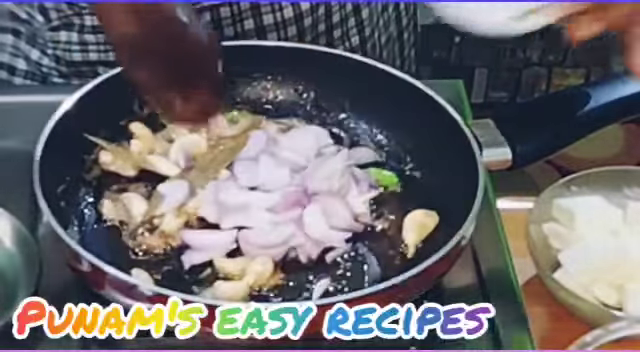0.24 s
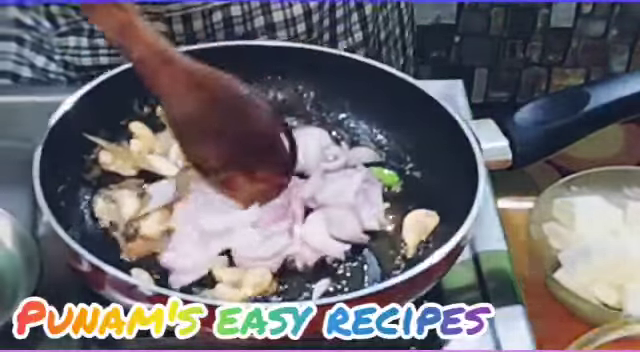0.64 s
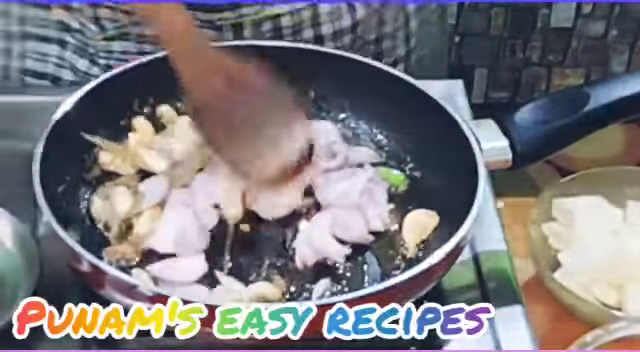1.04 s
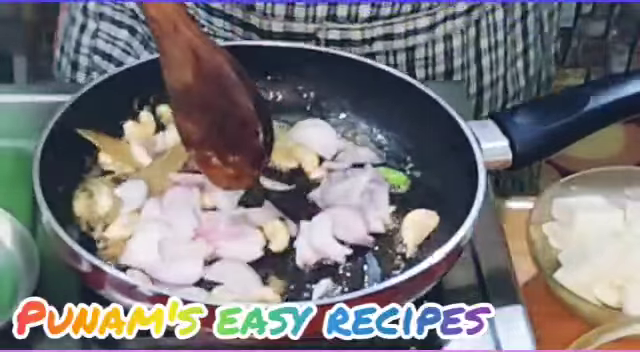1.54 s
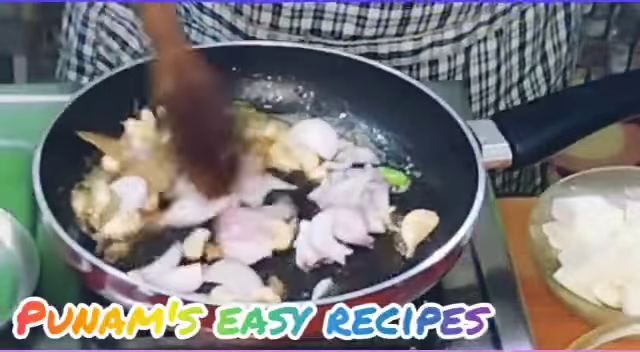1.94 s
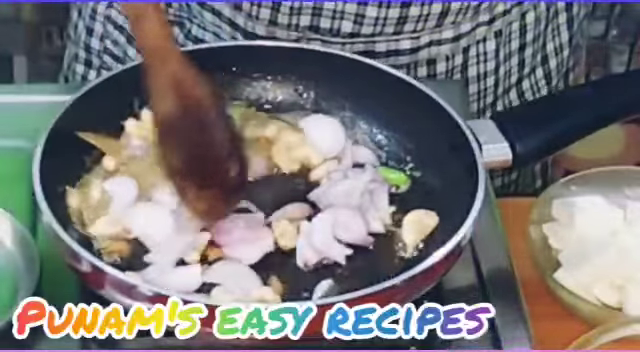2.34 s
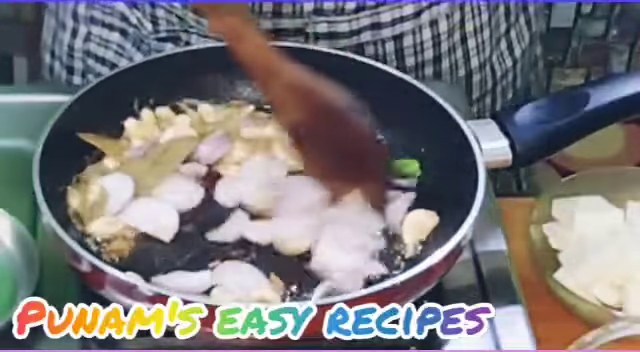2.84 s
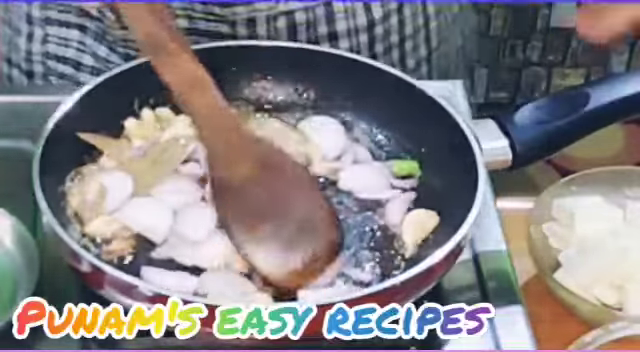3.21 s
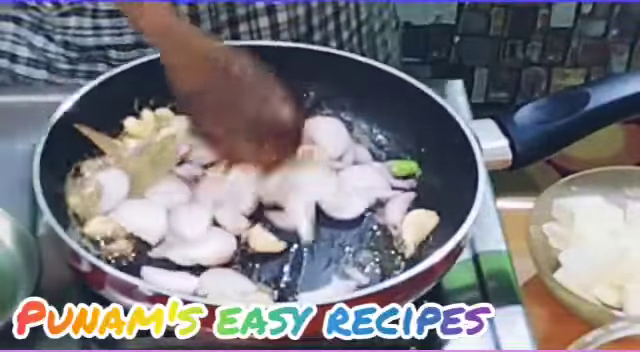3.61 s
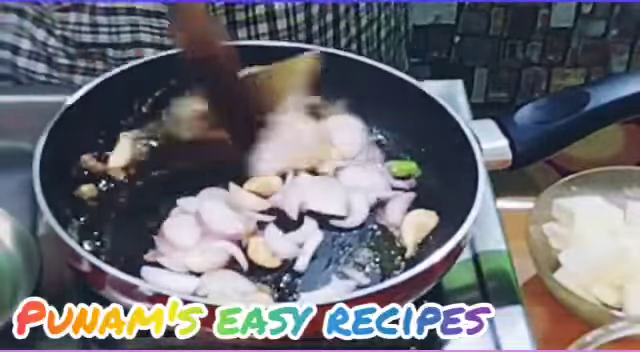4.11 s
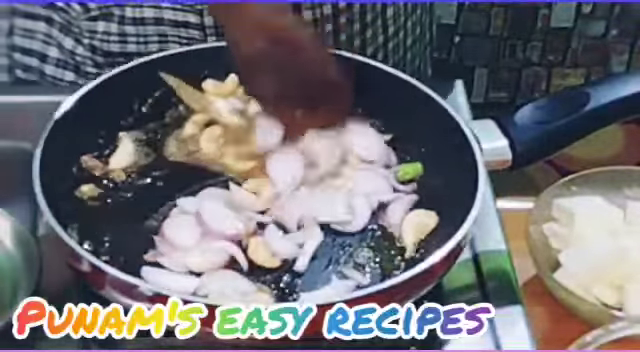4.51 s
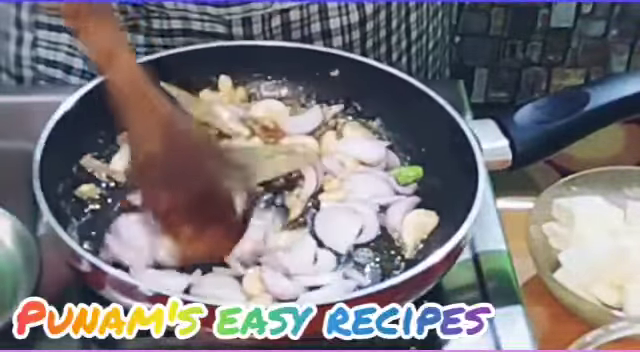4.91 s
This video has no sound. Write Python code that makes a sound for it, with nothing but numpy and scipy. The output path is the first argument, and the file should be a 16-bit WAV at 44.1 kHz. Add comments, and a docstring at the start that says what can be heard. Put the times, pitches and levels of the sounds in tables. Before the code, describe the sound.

Onions fry in butter with a crisp, airy hiss, stronger in the right channel than the shaded left. Each spatula turn makes it flare and spit snappy droplets. Soft scraping, slippery rustles and low pan bumps accompany the stirring, with muffled knocks before two seconds, then a dry clack and brighter knock past three and a half. Short tiled-room reflections and a faint motor draught surround it.

```python
"""Sliced onions sizzle in hot butter: thousands of tiny pings a second, over hiss, are bursting steam bubbles.
Drops spit as snaps of noise and in flurries of short pings; stirred slices rustle in filtered ticks.
A wooden spatula scrapes and knocks the pan, a bank of ringing modes that bumps on the stove; one hard clack.
A motor hums in steady lines over a noise draught in the small tiled kitchen.
The right microphone port faces the pan, the left one is shaded."""
import sys
import numpy as np
from scipy import signal
from scipy.fft import rfft, irfft, next_fast_len
from scipy.io import wavfile
from scipy.ndimage import uniform_filter1d, map_coordinates

SR = 44100
rng = np.random.default_rng(int(sys.argv[2]) if len(sys.argv) > 2 else 0)


def unload_audio(sound):
    """Save the sound as a 16-bit wav file, at the path given as the first command line argument."""
    columns = np.transpose(np.atleast_2d(sound))
    # keep every value between -1 and 1, then stretch to whole-number steps
    steps = np.round(np.clip(columns, -1, 1) * 32767)
    wavfile.write(sys.argv[1], SR, steps.astype(np.int16))


N = 227192
TOP_HZ = 15800  # band limit of the recorder, and the highest bubble pitch

# colour of frying sound at the microphone port that faces the pan: pitch_hz, relative_db
FACING_PORT = [(300, -39), (1100, -32.5), (2500, -27), (3700, -21), (5000, -21.5), (6300, -19.5),
               (7300, -17.5), (8200, -9.5), (9100, -3.5), (10300, -10), (12300, -10), (14200, -9),
               (15600, -5)]


def sizzle():
    """Bubble pings and the hiss of countless finer bubbles, in three bands that rise and fall separately."""
    simmer_db = simmer(np.arange(N) / SR)
    flare_db, fizz_flare_db = flares()
    mean_db = simmer_db.mean()
    level_db = simmer_db + flare_db
    fizz_db = simmer_db + 1 + fizz_flare_db + 0.22 * wobble(21.5)
    # big wet bubbles follow the simmer and its flares only in part
    sputter_db = mean_db - 17.5 + 0.76 * (simmer_db - mean_db) + 0.43 * flare_db + 0.5 * wobble(14)

    pings = np.array([in_kitchen(port, wet_db=-11)[0, :N] for port in bubbles()])
    hiss = amp(1) * rng.standard_normal((2, N))
    pair = uneven(pings + hiss, depth_db=1.4)
    pair = at_ports(pair / pair.std(axis=1, keepdims=True))

    # big wet bubbles sound low, the finest ones sound highest
    low = filtered(pair, lambda hz: 1 / (1 + (hz / 6400) ** 10))
    high = filtered(pair, lambda hz: 1 - 1 / (1 + (hz / 11500) ** 20))
    middle = pair - low - high
    sputter = uneven(low, depth_db=1.5, size=(4, 3))
    layers = [(middle, level_db), (high, fizz_db), (sputter, sputter_db)]
    return sum(band / np.std(band.mean(0)) * amp(db) for band, db in layers)


def bubbles(count=32000, life_s=0.000084):
    """Each bursting bubble is a tiny ping of its own pitch and size, in another phase at each port."""
    when, pitch, *phases = rng.random((4, count, 1))
    size_db = 3.9 * np.clip(rng.standard_normal((count, 1)), -2.5, 2.1)
    k = np.arange(SR // 1000)
    fade = amp(size_db) * np.exp(-k / SR / life_s)
    pings = [fade * np.sin(2 * np.pi * (pitch * TOP_HZ * k / SR + phase)) for phase in phases]
    places = ((when * N).astype(int) + k).ravel()
    return np.array([unit(np.bincount(places, port.ravel(), N)[:N]) for port in pings])


def simmer(s):
    """Level in dB of the steady frying at times s, which builds as the onions warm and spread."""
    # the steady frying: time_s, level_db
    frying_levels = [(0, -42), (.4, -39), (1.1, -35), (1.75, -35), (2.4, -31.5), (2.95, -31.5),
                     (3.9, -33.5), (4.4, -34.5), (4.7, -32), (5.15, -33)]
    return np.interp(s, *np.transpose(frying_levels))


def flares():
    """Stirring turns wet onion onto hot metal: rises in dB of sizzle and fizz that swell and dry off."""
    # turns of wet onion: start_s, time_to_peak_s, sizzle_rise_db, finest_fizz_rise_db
    turns = [(.063, 0.035, 1.5, -2), (.461, 0.055, 2.5, 1.5), (.633, 0.019, 3, 3), (.815, 0.06, 3.5, 4.5),
             (.925, 0.073, 2, 3.5), (1.215, 0.12, 3.5, 5), (1.82, 0.13, 1.5, 3), (2.045, 0.045, 4, -1),
             (2.2, 0.027, 2.2, 2), (2.594, 0.025, 5.5, 3), (2.627, 0.069, 2, -0.5),
             (2.827, 0.091, 1.7, 3.5), (3.123, .071, 1.5, 1.5), (4.02, 0.092, 3.5, 3), (4.259, 0.016, 3, 3),
             (4.538, 0.042, 2, 2.5), (4.722, 0.083, 1, 0.5), (4.831, 0.09, -0.5, 2.5)]
    track = np.zeros((2, N))
    for s, swell_s, *rises_db in turns:
        u = np.arange(SR) / SR / swell_s
        add(track, s, np.outer(rises_db, u ** 2 * np.exp(2 - 2 * u)))
    return track


def uneven(x, depth_db, size=(3, 7)):
    """Random smooth gain over frequency and time makes the noise uneven; size is in bins and frames."""
    z = signal.stft(x, nperseg=256)[2]
    field = uniform_filter1d(rng.standard_normal(z.shape[1:]), size[0], 0)
    field = uniform_filter1d(field, size[1], 1)
    return signal.istft(z * amp(depth_db * unit(field)), nperseg=256)[1][:, :N]


def spits(lowest_hz=5000, small_count=12, life_s=0.00035):
    """A drop of water flashes to steam with one very short, high snap."""
    # the loudest drops, as heard at the facing port: time_s, peak_db
    loud_drops = [(.144, -15), (.511, -17), (.646, -12), (1.305, -11), (1.421, -11), (1.851, -14),
                  (2.045, -10), (2.101, -9), (2.243, -7), (2.426, -11), (2.614, -5.5), (2.677, -9),
                  (2.703, -8), (2.754, -9), (3.103, -10), (3.165, -12), (3.559, -10), (3.620, -9),
                  (3.806, -11), (4.047, -12), (4.413, -12), (4.580, -8.5), (4.759, -8), (5.039, -11)]
    small_drops = []
    for s in rng.random(small_count) * N / SR:
        # peak 8 dB over the simmer, with a scatter of 1 dB
        small_drops.append((s, simmer(s) + 8 + rng.standard_normal()))

    track, t = np.zeros(N), np.arange(SR // 200) / SR
    fade = np.exp(-t / life_s)
    for s, db in list(loud_drops) + small_drops:
        noise = rng.standard_normal(len(t)) * fade
        snap = filtered(noise, lambda hz: 1 - 1 / (1 + (hz / lowest_hz) ** 4))
        heard = np.convolve(snap, impulse(FACING_PORT))
        add(track, s, amp(db) * snap / np.abs(heard).max())
    return at_ports([track, track], shade_db=-13)


def spatters(rate=420, spread_db=4, pitch_scatter=0.19, life_s=0.00085):
    """A wet face of onion slaps onto the metal and throws a quick flurry of droplets, each a short ping."""
    # flurries of droplets, as heard at the facing port: start_s, length_s, level_db, centre_hz
    flurries = [(.482, 0.018, -41, 8000), (1.614, 0.027, -35, 7300), (1.672, 0.024, -29, 12500),
                (2.076, .04, -33, 8100), (2.24, .025, -28, 8330), (2.659, 0.054, -27, 7700),
                (2.955, 0.025, -29, 9300), (3.16, 0.047, -37, 8800), (4.035, .015, -27, 8900),
                (4.102, 0.024, -27, 7310), (4.63, .05, -32.5, 8150)]
    track, t = np.zeros(N), np.arange(SR // 400) / SR
    for s, length, db, centre_hz in flurries:
        flurry = np.zeros(SR // 2)
        # the droplets are densest at 0.3 of the length
        for when in rng.triangular(0, .3, 1, int(rate * length) + 1) * length:
            size, pitch = rng.standard_normal(2)
            hz = centre_hz * np.exp(pitch_scatter * pitch)
            ping = np.exp(-t / life_s) * np.sin(2 * np.pi * hz * t)
            add(flurry, when, amp(spread_db * size) * ping)
        heard = np.convolve(flurry[:int(length * SR) + len(t)], impulse(FACING_PORT))
        add(track, s, amp(db) * flurry / np.sqrt(np.sum(heard ** 2) / (length * SR)))
    return at_ports([track, track], shade_db=-19)


def rustles(rate=900, spread_db=4, sharpness=0.86):
    """Crisp slices, pushed over each other, slip in many small ticks; sharpness is centre over width."""
    # rubs, with levels ahead of the port gains and the walls: start_s, length_s, relative_db, centre_hz
    rubs = [(.98, 0.12, -57, 4500), (1.235, 0.075, -53, 3750), (2.062, 0.054, -49.5, 4380),
            (2.30, 0.11, -55.5, 2570), (2.50, 0.13, -53.5, 2270), (2.86, 0.066, -56, 3800),
            (3.399, 0.11, -60.5, 1940), (3.93, 0.23, -61.5, 2000), (4.25, 0.28, -62.5, 1770),
            (4.50, 0.29, -74, 3800)]
    track = np.zeros((2, N))
    for s, length, db, centre_hz in rubs:
        n = int(max(length, .02) * SR)
        ticks = bursts(n, rate, spread_db) * signal.windows.tukey(n, .5)
        detune = lambda hz: hz / centre_hz - centre_hz / (hz + 1)
        rub = filtered(ticks, lambda hz: 1 / (1 + (sharpness * detune(hz)) ** 2))
        add(track, s, in_kitchen(amp(db) * unit(rub), wet_db=-3.5))
    return track * amp([[-2.5], [1.5]])  # left and right, in dB


def knocks(thud=7, thud_hz=620, thud_life_s=0.00086, held_cycles=15):
    """Wood strikes the pan and stays on it, stilling the high modes first; onions in between soften it."""
    # strikes, rebounds and the tipped pan dropping back, ahead of the port gains and the walls:
    # time_s, relative_db, contact_cutoff_hz
    blows = [(1.846, -39, 650), (1.853, -45, 780), (1.861, -38, 657), (1.892, -43.5, 210),
             (1.908, -50, 318), (2.071, -50.5, 520), (2.084, -49, 422), (2.124, -52, 260),
             (2.613, -57, 710), (3.790, -35.5, 1350), (3.803, -44.5, 259), (3.822, -50, 800),
             (3.860, -51, 500)]
    track, onset = np.zeros((2, N)), SR // 50
    for s, db, cutoff_hz in blows:
        ring = pan_ring(held_cycles)
        t = np.arange(len(ring)) / SR
        wood_hz = np.sqrt(thud_hz * cutoff_hz)  # a harder contact thuds higher
        wood = thud * np.exp(-t / thud_life_s) * np.sin(2 * np.pi * wood_hz * t)
        blow = cushioned(ring / np.std(ring[:onset]) + wood, cutoff_hz)
        add(track, s, in_kitchen(amp(db) * blow / np.std(blow[:onset]), wet_db=-3))
    return track * amp([[-.7], [.7]])  # left and right, in dB


def scrapes(dead_life_s=0.005):
    """The spatula's edge catches and slips; resting on the pan, it damps the modes it shakes."""
    # strokes across the pan, with levels ahead of a common cut:
    # start_s, length_s, relative_db, contact_cutoff_hz
    strokes = [(0.39, 0.052, -65.5, 300), (.71, 0.053, -53.5, 445), (.755, 0.13, -57, 378),
               (1.10, 0.17, -58, 440), (2.055, 0.03, -40.5, 480), (2.42, 0.26, -58, 380),
               (2.724, 0.16, -62, 260), (3.055, 0.085, -55, 407), (3.409, 0.17, -60, 330),
               (3.768, 0.025, -42, 1160), (3.88, 0.12, -55, 375), (4.379, 0.079, -60.5, 520),
               (4.801, 0.064, -59.5, 396), (5.07, 0.086, -57, 400)]
    track = np.zeros((2, N))
    for s, length, db, cutoff_hz in strokes:
        n = int(max(length, .02) * SR)
        slips = bursts(n, rate=700, spread_db=0.5) * signal.windows.tukey(n, .55)
        ring = pan_ring()
        ring *= np.exp(-np.arange(len(ring)) / SR / dead_life_s)
        rub = cushioned(signal.fftconvolve(slips, ring), cutoff_hz)
        add(track, s, in_kitchen(amp(db - 5.5) * rub / (np.std(rub[:n]) + 1e-9), wet_db=-2.5))
    return track


def pan_ring(held_cycles=np.inf, scatter_db=1.5):
    """The pan's modes, at new strengths for every contact; when held, they die within some cycles."""
    # modes of the pan with its load: pitch_hz, relative_db, t60_s
    modes = [(158.4, -7.5, 0.21), (237.6, -1.5, 0.21), (297, 0.5, 0.1), (386, -4.5, 0.072),
             (447.5, -2.5, 0.08), (523, -5, 0.071), (614, 1.5, 0.17), (726, 0.5, 0.25), (762, -6.5, 0.13),
             (890, 0, 0.069), (1031, -1, 0.08), (1070, 3.5, 0.074), (1260, 6.5, 0.18), (1390, 3, 0.1),
             (1600, 4, .06), (1750, -5, 0.05), (2130, 3, 0.039)]
    t = np.arange(SR // 4) / SR
    hz, db, t60 = np.transpose(modes)[:, :, None]
    sizes = amp(db + scatter_db * rng.standard_normal(hz.shape)) * rng.choice([-1, 1], hz.shape)
    fade = amp(-60 * t / t60) * np.exp(-t * hz / held_cycles)
    return np.sum(sizes * fade * np.sin(2 * np.pi * hz * t), axis=0)


def cushioned(x, cutoff_hz, bass_share=0.34):
    """A soft contact gives a dull, low sound; a hard one is brighter and thinner."""
    soft = signal.butter(3, min(cutoff_hz, SR / 4), fs=SR, output="sos")
    thin_hz = np.clip(bass_share * cutoff_hz, 130, 600)
    thin = signal.butter(3, thin_hz, "high", fs=SR, output="sos")
    return signal.sosfilt(np.vstack([soft, thin]), x)


def bumps(swell_s=0.0072):
    """Pushed sideways by the spatula, the pan rocks on the stove with dull low thuds."""
    # rocking thuds: start_s, peak_db, pitch_hz
    rocks = [(.414, -59, 101), (.464, -59, 85), (.728, -61, 115), (1.132, -56, 104), (1.164, -56, 115),
             (1.19, -55, 85), (1.491, -63, 100), (1.877, -50, 115), (2.065, -59, 105), (2.14, -54, 100),
             (2.484, -58, 100), (2.748, -54, 100), (3.132, -60, 101), (3.422, -60, 104), (3.487, -63, 105),
             (3.791, -51, 109), (4.554, -61, 100), (5.099, -46, 102)]
    track, t = np.zeros(N), np.arange(SR // 5) / SR
    shape = (t / swell_s / 2) ** 2 * np.exp(2 - t / swell_s)  # peaks after two swell times
    for s, db, hz in rocks:
        add(track, s, amp(db) * shape * np.sin(2 * np.pi * hz * t))
    return track


def clacks(rattle_db=-25, rattle_life_s=0.015, graze_db=-37, graze_s=.008):
    """A hard, dry contact a little way off grazes, hits, chatters briefly and wakes the room."""
    # hits, with the peak ahead of the chatter and the walls: time_s, peak_db
    hits = [(3.6335, -21)]
    # colour of the hard contact: pitch_hz, relative_db
    contact_colour = [(300, -34), (800, -9.5), (1500, -2), (2200, -3), (3300, 3), (4200, 1), (5200, -5.5),
                      (6200, -19), (9000, -17)]
    track, t = np.zeros((2, N)), np.arange(SR // 8) / SR
    colour = impulse(contact_colour)
    after = t - graze_s
    rattle = amp(rattle_db) * np.exp(-after / rattle_life_s)
    for s, db in hits:
        contact = rng.standard_normal(len(t)) * np.where(after < 0, amp(graze_db), rattle)
        contact[np.argmin(np.abs(after))] += 1
        clack = amp(db) * np.convolve(contact, colour) / np.abs(colour).max()
        add(track, s - graze_s, in_kitchen(clack, wet_db=-3))
    return track


def motor():
    """A slightly unsteady hum of sine lines over a soft draught of coloured noise."""
    # motor lines: pitch_hz, peak_db
    lines = [(43, -79.5), (147.5, -60), (198, -77)]
    # colour of the motor draught: pitch_hz, relative_db
    draught_colour = [(20, 4.5), (42, -28), (70, -20), (115, 0.5), (160, 1.5), (230, -3), (400, -4),
                      (540, -9), (760, -3.5), (1200, -12), (1310, -34), (1440, 6), (1580, -8), (2200, -4),
                      (5000, -10)]
    t = np.arange(N) / SR
    hum = np.zeros(N)
    for hz, db in lines:
        hum += amp(db + 0.68 * wobble(6.5)) * np.sin(2 * np.pi * hz * t + 0.11 * wobble(3.9))
    draught = filtered(diffuse(N), lambda hz: amp(along(draught_colour, hz)))
    return hum + amp(-55.5) * unit(draught)


def in_kitchen(x, wet_db):
    """A sound and the answer of the tiled walls, a noise tail that fades at its own pace in each band."""
    # fading of the kitchen: pitch_hz, t60_s
    fading = [(150, 0.25), (600, 0.44), (1500, 0.33), (4000, 0.46), (12000, 0.049)]
    hz, t, z = signal.stft(diffuse(SR // 2), SR, nperseg=256)
    fade = amp(-60 * t / along(fading, hz)[:, None]) * (1 - np.exp(-t / 0.00099))
    tail = signal.istft(z * fade, SR, nperseg=256)[1]
    tail *= amp(wet_db) / np.linalg.norm(tail[0])
    tail[:, 0] += 1  # the direct sound
    return signal.fftconvolve(x[None], tail, axes=1)


def diffuse(n):
    """Stereo noise from all around: alike in the bass, less so in the treble."""
    # likeness of room sound at the two ports: pitch_hz, left_right_correlation
    likeness = [(100, 1), (250, 0.93), (500, 0.81), (1000, 0.3), (2500, 0.59), (5000, 0.26)]
    turn = lambda hz: np.arccos(np.clip(along(likeness, hz), -1, 1)) / 2
    shares = lambda hz: np.array([np.cos(turn(hz)), np.sin(turn(hz))])
    mid, side = filtered(rng.standard_normal((2, n)), shares)
    return np.array([mid + side, mid - side])


def at_ports(pair, shade_db=-14.0):
    """Frying sound coloured by the two ports; the right one has gain 1."""
    # colour at the port shaded from the pan: pitch_hz, relative_db
    shaded_port = [(300, -42.5), (1100, -33.5), (3000, -29), (7400, -33.5), (8300, -31.5), (10500, -27),
                   (12500, -21), (13500, -16), (14200, -17.5), (15600, -23)]
    left = amp(shade_db) * signal.fftconvolve(pair[0], impulse(shaded_port))
    right = signal.fftconvolve(pair[1], impulse(FACING_PORT))
    return np.array([left, right])[:, :N]


def bursts(n, rate, spread_db):
    """n samples of randomly timed impulses of uneven size and either sign, rms 1 over a second."""
    sizes = amp(spread_db * np.clip(rng.standard_normal(SR), -3, 2.5))
    hits = rng.random(SR) < rate / SR
    return unit(hits * sizes * rng.choice([-1, 1], SR))[:n]


def impulse(points, size=2048):
    """The causal impulse response of a spectrum, energy 1, by folding its cepstrum (minimum phase)."""
    cepstrum = irfft(np.log(amp(along(points, np.fft.rfftfreq(size, 1 / SR)))))
    cepstrum[1:size // 2] *= 2
    cepstrum[size // 2 + 1:] = 0
    h = irfft(np.exp(rfft(cepstrum)))
    return h / np.linalg.norm(h)


def filtered(x, response):
    """x with its spectrum multiplied by a response of frequency."""
    n = x.shape[-1]
    m = next_fast_len(n + SR // 4)
    return irfft(rfft(x, m) * response(np.fft.rfftfreq(m, 1 / SR)), m)[..., :n]


def wobble(rate):
    """A smooth random curve, rate knots a second."""
    knots = rng.standard_normal(int(N * rate / SR) + 4)
    return map_coordinates(knots, [np.arange(N) * rate / SR])


def along(points, hz):
    """(Hz, value) points read on a log axis."""
    f, v = np.transpose(points)
    return np.interp(np.log(hz + 1), np.log(f + 1), v)


def add(track, s, sound):
    """Mix a sound into the track at time s."""
    start = int(np.clip(round(s * SR), 0, N - 1))
    track[..., start:start + sound.shape[-1]] += sound[..., :N - start]


def amp(db):
    """Decibels to gain."""
    return 10 ** (np.asarray(db) / 20)


def unit(x):
    """Scaled to rms 1."""
    return x / np.sqrt(np.mean(x ** 2) + 1e-20)


def scene():
    """The frying pan, the spatula and the kitchen."""
    frying = sizzle() + spits() + spatters()
    stirring = rustles() + knocks() + scrapes() + bumps()
    return frying + stirring + clacks() + motor()


def record(dry):
    """The recorder keeps nothing above its band limit."""
    return filtered(dry, lambda hz: np.clip((TOP_HZ - hz) / 100 + .5, 0, 1))


dry = scene()
out = record(dry)
unload_audio(out)
```